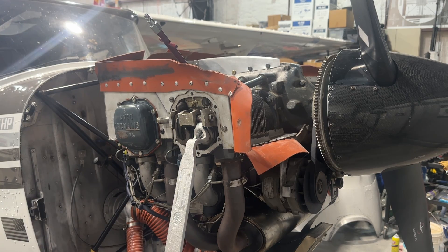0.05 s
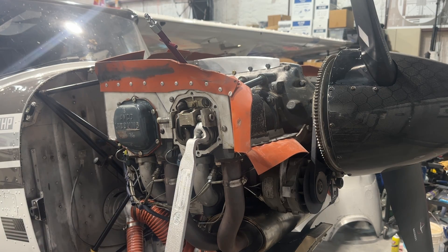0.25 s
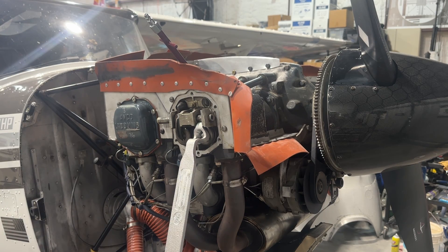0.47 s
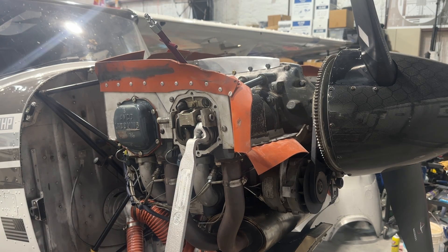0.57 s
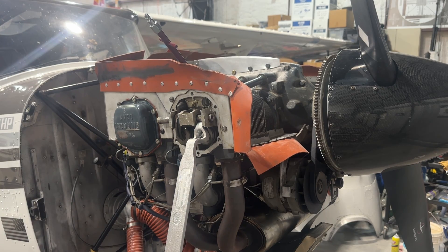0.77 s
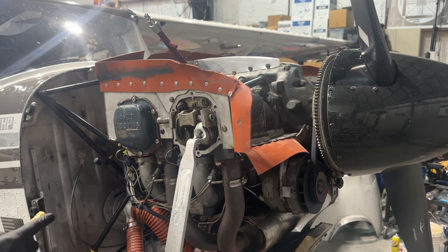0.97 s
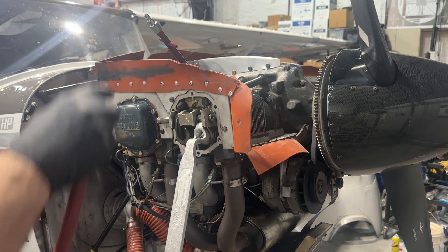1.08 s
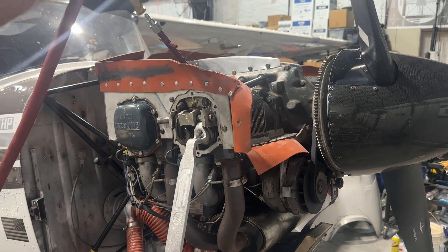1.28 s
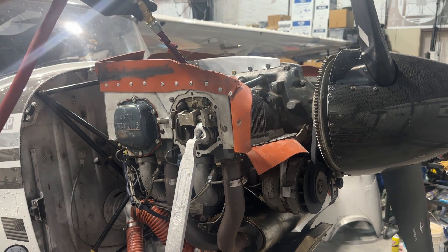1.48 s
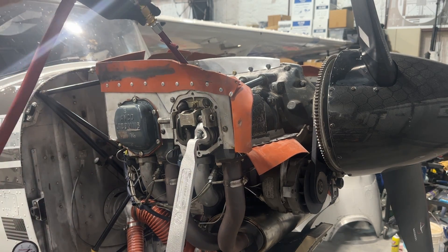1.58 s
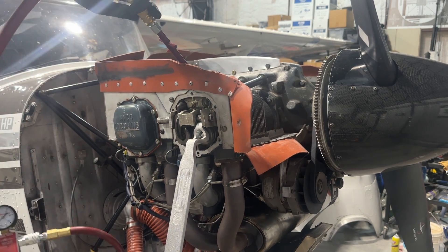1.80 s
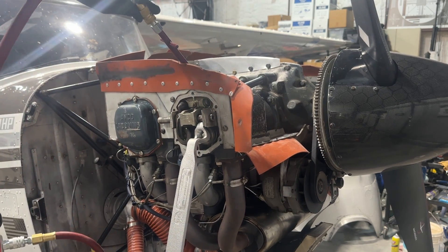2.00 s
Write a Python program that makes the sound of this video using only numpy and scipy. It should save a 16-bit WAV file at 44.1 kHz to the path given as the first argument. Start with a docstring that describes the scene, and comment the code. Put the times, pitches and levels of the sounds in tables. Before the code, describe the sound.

A short hiss of compressed air from an uncoupled hose, then light metal clinks.

```python
"""Compressed air escapes as a hose is uncoupled: a sharp spit, then the hiss of a turbulent jet that
weakens as the pressure falls. The hose is then handled: friction makes it rustle and scrape,
and impacts excite the natural modes of its metal fittings, which clink against an engine.
Distant machines rumble and hum in the reverberant workshop; two microphone ports stand close by."""
import sys
import numpy as np
from scipy import signal
from scipy.fft import rfft, irfft
from scipy.io import wavfile
from scipy.ndimage import uniform_filter1d, map_coordinates

SR = 44100
rng = np.random.default_rng(int(sys.argv[2]) if len(sys.argv) > 2 else 0)


def master(y):
    """Save y as 16-bit WAV."""
    cut = np.clip(np.atleast_2d(y).T, -1, 1)
    pcm = np.round(cut * 32767)  # scale
    wavfile.write(sys.argv[1], SR, pcm.astype(np.int16))


N = 90404
T, HZ = np.arange(N) / SR, np.fft.rfftfreq(N, 1 / SR)
RELEASE_S = 0.1932

# workshop sound at the two ports (frequency [Hz], coherence [0-1], left lead [rad], left - right [dB])
ROOM_AT_PORTS = [(78, 1, 0.058, 0), (396.7, 0.48, 0.016, 1.4), (2500, 0.23, 0.1, 0.5), (6550, 0.3, .3, 7),
                 (8500, 0.27, 0.082, 0.5)]


def jet(weak_from_s=.37, weak_by_s=.49, eddy_db=2, flutter_db=.5):
    """Turbulent jet noise: as pressure falls the hiss weakens and narrows onto the coupling's modes."""
    # spectra at full and at low pressure (frequency [Hz], relative level [dB])
    full_spectrum = [(500, -26.5), (900, -20.5), (1650, -6.5), (2600, -8.5), (3900, -8.5), (5100, 0.5),
                     (6800, 3.5), (8000, -5), (10200, -10), (11800, -4.5), (15000, 0.5)]
    weak_spectrum = [(550, -38.5), (2100, -11.5), (2900, -16.5), (5300, -8.5), (6200, 3), (7300, -11),
                     (10200, -24.5), (11500, -11), (13500, -20), (15500, -7)]
    # strength of the jet (time [s], level [dB])
    strength = [(.195, -100), (.206, -26.5), (.24, -21.5), (.375, -22.5), (.45, -28), (.496, -29),
                (.55, -38), (.6, -43.5), (.666, -54), (.8, -78.5)]
    weak = np.clip((T - weak_from_s) / (weak_by_s - weak_from_s), 0, 1)
    air = np.sqrt(1 - weak) * noise(full_spectrum) + np.sqrt(weak) * noise(weak_spectrum)
    air = early_reflections(cowling_echo(air), echo_db=-9)
    hz, t, spectra = signal.stft(air, SR, nperseg=256)
    eddies = uniform_filter1d(rng.standard_normal(spectra.shape[1:]), size=10, axis=0)
    eddies = unit(uniform_filter1d(eddies, size=8, axis=1))  # patches in frequency and time
    # a low-pass fade removes the treble from 0.55 s on
    treble_octaves = np.log2(np.maximum(hz / 5500, 1))
    fade_db = 156.5 * np.outer(treble_octaves, np.maximum(t - .55, 0))
    air = signal.istft(spectra * amp(eddy_db * eddies - fade_db), nperseg=256)[1][:, :N]
    return air * envelope(strength) * amp(flutter_db * drift(rate_hz=150))


def cowling_echo(x, delay_s=.00286, growth_per_s=.125, echo_db=-7):
    """Comb filtering: an echo interferes with the hiss; the notches slide down as the hose recoils."""
    emitted_s = T - delay_s * (1 + growth_per_s * (T - RELEASE_S))
    echo = np.array([map_coordinates(side, [emitted_s * SR]) for side in x])
    return unit(x - amp(echo_db) * echo)


def spit(rise_s=.011, hold_s=.011, decay_s=.012, level_db=-15.5):
    """Sudden expansion: the seal breaks with a blast, and the sleeve rings as it snaps back."""
    # spectrum of the blast (frequency [Hz], relative level [dB])
    spectrum = [(200, -24.5), (380, -27), (560, -17.5), (850, -21), (2200, -20.5), (2900, -5.5), (4100, -8),
                (5200, -2), (6900, 0.5), (8500, -5), (10500, -13.5), (15500, -1.5)]
    # modes of the sleeve (frequency [Hz], level [dB], T60 [s])
    sleeve_modes = [(3640, -38.5, 0.43), (5140, -31, 0.14), (6820, -27.5, 0.19), (8420, -22, 0.13)]
    t = np.maximum(T - RELEASE_S, 0)
    shape = np.minimum(t / rise_s, 1) ** 2 * np.exp(-np.maximum(t - rise_s - hold_s, 0) / decay_s)
    return amp(level_db) * shape * noise(spectrum) + ring(RELEASE_S + rise_s, sleeve_modes)


def plug():
    """Damped vibration: the freed plug taps twice, its ring shortened by the hand."""
    # taps (time [s])
    taps = [.752, .764]
    # mode of the plug (frequency [Hz], level [dB], T60 [s])
    modes = [(2612, -46, 0.057)]
    return sum(ring(start, modes) for start in taps)


def knocks(clatter_db=7.5, ring_db=-4.5, bass_lag_s=.0046, bracket_s=1.298):
    """Impact excitation: each knock is a brief clatter of contacts that sets the fittings ringing."""
    # knocks (time [s], clatter decay [s], then a level [dB] for each of the four bands)
    impacts = [(.747, 0.016, -56.5, -53.5, -63, -55), (1.295, 0.0073, -38, -37.5, -34.5, -46),
               (1.3734, 0.0042, -42.5, -39.5, -30.5, -44.5), (1.390, 0.02, -54, -48.5, -48, -67),
               (1.440, 0.016, -50, -45.5, -42, -52), (1.5496, 0.0084, -46.5, -31.5, -36.5, -49),
               (1.968, 0.012, -61, -60, -47, -60.5), (1.9787, 0.0091, -46, -48.5, -40.5, -44.5)]
    # band centres (frequency [Hz])
    bands = [1050, 2040, 3090, 4950]
    # spectrum of the clatter (frequency [Hz], relative level [dB])
    spectrum = [(120, -31), (300, -7), (560, 2.5), (1500, 3.5), (2100, 5.5), (2700, -2.5), (3500, 6.5),
                (4200, 0.5), (7200, -1.5), (10000, -6), (11300, -39), (14000, -11)]
    # modes of the fittings (frequency [Hz], relative level [dB], T60 [s])
    fitting_modes = [(1241, -6.5, 0.16), (1830, -6, 0.1), (2145, -5.5, 0.18), (3118, -4.5, 0.069),
                     (3500, -9, 0.22), (3780, -14, 0.16), (5190, -4.5, 0.098), (7040, 1.5, 0.08)]
    # modes of an engine bracket, rung by the hardest knock (frequency [Hz], level [dB], T60 [s])
    bracket_modes = [(553.6, -38.5, 0.11), (973, -34.5, 0.067), (2342, -42, .08), (3490, -36.5, 0.064)]
    out = np.zeros((2, N))
    bass = 1 / (1 + (HZ / 1400) ** 6)
    for start, decay, *band_db in impacts:
        weight = list(zip(bands, band_db))
        rise = .25 * decay  # longer clatters start more softly
        colour = amp(at_hz(spectrum, HZ) + at_hz(weight, HZ) + clatter_db)
        contacts = rfft(rng.standard_normal((2, N))) * colour
        out += irfft(contacts * bass, N) * strike(start, rise + bass_lag_s, decay)
        out += irfft(contacts * (1 - bass), N) * strike(start, rise, decay)
        out += ring(start, [(hz, db + at_hz(weight, hz) + ring_db, t60) for hz, db, t60 in fitting_modes])
    return early_reflections(out + ring(bracket_s, bracket_modes), echo_db=-17)


def scrapes(relative_half_width=.07, relative_fall=.05):
    """Stick-slip friction on the engine: uneven slips excite one slightly sinking resonance per stroke."""
    # strokes of hose and fittings (time [s], duration [s], resonance [Hz], level [dB])
    strokes = [(1.098, 0.039, 810, -72), (1.385, 0.083, 735, -55), (1.382, .09, 4750, -54),
               (1.432, 0.028, 7280, -50.5), (1.3, 0.077, 6100, -55)]
    out = np.zeros((2, N))
    grip = np.exp(.5 * drift(rate_hz=200))
    for start, length, hz, db in strokes:
        along = np.clip((T - start) / length, 0, 1)
        carrier = np.exp(2j * np.pi * np.cumsum(hz * (1 - relative_fall * along)) / SR)
        slips = irfft(rfft(rng.standard_normal((2, 2, N))) / (1 + (HZ / (relative_half_width * hz)) ** 2), N)
        resonance = slips[0] * carrier.real + slips[1] * carrier.imag
        out += amp(db) * np.sqrt(abs(np.sin(np.pi * along))) * unit(grip * resonance)
    return out


def handling(rustle_grain_db=2, scuff_grain_db=3):
    """Friction and light impacts: the moving hose rustles, scuffs and ticks in bursts of noise."""
    # the hose slides through the hands (time [s], level [dB])
    sliding = [(0, -67.5), (.11, -86), (.65, -76.5), (.78, -66), (.98, -66.5), (1.06, -70.5), (1.17, -67),
               (1.23, -74), (1.45, -65.5), (1.6, -80), (1.87, -65), (1.92, -80.5), (2.05, -62)]
    # dull scuffs (time [s], half-length [s], level [dB])
    scuff_events = [(1.542, 0.0088, -53.5), (1.725, 0.017, -63.5), (1.79, 0.028, -60.5),
                    (1.838, 0.016, -59)]
    # ticks of hose and gauge (time [s], decay [s], level [dB])
    tick_events = [(0.869, 0.014, -55), (1.1859, 0.0048, -45), (1.2489, 0.00052, -42.5),
                   (1.287, .0008, -46), (1.357, 0.00072, -46), (1.663, 0.0073, -56)]
    # spectra of the three sounds (frequency [Hz], relative level [dB])
    rustle_spectrum = [(300, -8), (1200, -1.5), (6200, 3), (8800, 2), (11000, -26.5), (15000, -9.5)]
    scuff_spectrum = [(150, 2.5), (320, -0.5), (1200, 0), (2500, -7), (7000, -39)]
    tick_spectrum = [(300, -9), (4000, 7.5), (7000, 15.5), (11000, -20), (15000, -7)]
    grain = drift(rate_hz=200)
    rustle = noise(rustle_spectrum) * envelope(sliding)
    rustle *= unit(amp(rustle_grain_db * (grain + drift(rate_hz=16))))
    swells = sum(amp(db) * np.exp(-((T - centre) / width) ** 2) for centre, width, db in scuff_events)
    scuffs = noise(scuff_spectrum) * swells * unit(amp(scuff_grain_db * grain))
    pulses = sum(amp(db) * strike(start, .00029, decay) for start, decay, db in tick_events)
    return rustle + scuffs + noise(tick_spectrum) * pulses


def bumps():
    """Heavy damping: each soft bump of the rubber hose lasts a few cycles and sags in pitch."""
    # bumps (time [s], initial frequency [Hz], peak level [dB], decay [s], exponent of the pitch fall [-])
    events = [(1.1926, 1070, -48.5, 0.0063, 2.01), (1.221, 131, -40, 0.0066, .12),
              (1.272, 115.5, -47.5, 0.0295, .17)]
    out = np.zeros(N)
    for start, hz, db, decay, sag in events:
        age = np.maximum(T - start, 0) / decay
        cycles = np.cumsum(hz * (age > 0) * (1 + age) ** -sag) / SR
        out += amp(db) * age * np.exp(1 - age) * np.sin(2 * np.pi * cycles)
    return out


def machines(waver=.02):
    """Machine noise: distant machines give a continuous rumble spectrum and two wavering hum lines."""
    # spectrum of the rumble and lines of the hum (frequency [Hz], relative level [dB])
    spectrum = [(25, -4), (80, 6), (120, -3.5), (170, -1), (230, -10.5), (400, -18.5), (800, -31.5),
                (5000, -36), (16000, -70)]
    hum_lines = [(78, -8), (168, -12)]
    # strength of both together (time [s], level [dB])
    strength = [(.2, -54.5), (.45, -60.5), (.7, -58.5), (1.3, -57), (1.6, -53), (2.05, -53.5)]
    hum = np.zeros(N)
    for hz, db in hum_lines:
        cycles = np.cumsum(hz * (1 + waver * drift(rate_hz=5.2))) / SR
        hum += amp(db) * np.sqrt(2) * np.sin(2 * np.pi * cycles)
    return (ports(noise(spectrum), ROOM_AT_PORTS) + hum) * envelope(strength)


def early_reflections(x, echo_db, count=24):
    """Interference: reflections off engine and cowling, 1 to 33 ms late, comb the sound."""
    taps = np.zeros((2, SR // 30))
    for side in taps:
        echoes = rng.choice([-1, 1], count) * amp(echo_db) / np.sqrt(count)
        side[rng.integers(SR // 1000, len(side), count)] = echoes
    taps[:, 0] = 1
    return signal.fftconvolve(x, taps / np.linalg.norm(taps[0]), axes=1)[:, :N]


def reverberation(x):
    """Diffuse field: the workshop's tail decays exponentially, fastest in the treble."""
    # reverberation time (frequency [Hz], T60 [s])
    t60 = [(1000, 0.56), (3000, 0.54), (15000, 0.26)]
    hz, t, spectra = signal.stft(rng.standard_normal((2, SR)), SR, nperseg=256)
    tail = signal.istft(spectra * amp(-60 * t / at_hz(t60, hz)[:, None]), SR, nperseg=256)[1]
    tail[:, :SR // 200] = 0  # begins after 5 ms
    return signal.fftconvolve(x, tail / np.linalg.norm(tail[0]), axes=1)[:, :N]


def ports(x, table, size=512):
    """Partial coherence: two unrelated signals mix into a stereo pair of set likeness, phase and balance."""
    table, hz = np.array(table), np.fft.rfftfreq(size, 1 / SR)
    coherence, lead, pan_db = (at_hz(table[:, [0, k]], hz) for k in (1, 2, 3))
    shared, apart = np.sqrt((1 + coherence) / 2), np.sqrt((1 - coherence) / 2)
    sides = np.array([amp(pan_db), np.exp(-1j * lead)]) * np.sqrt(2 / (1 + amp(pan_db) ** 2))
    mixing = sides[:, None] * np.array([[shared, apart], [shared, -apart]])
    taps = np.fft.fftshift(irfft(mixing), -1) * np.hanning(size)
    return signal.fftconvolve(x[None], taps, axes=-1).sum(1)[:, size // 2:][:, :N]


def ring(start, modes, relative_split=.05, rise_s=.0019):
    """Free vibration: each mode beats with a weaker, shorter-lived neighbour; sides are in quadrature."""
    t, out = T[:SR // 2], np.zeros(N + SR, complex)
    at, onset = round(start * SR), np.minimum(t / rise_s, 1)
    for hz, db, t60 in modes:
        decay = amp(-60 * t / t60)
        beat_hz = hz * rng.normal(0, relative_split)
        neighbour = .5 * np.sqrt(decay) * np.exp(2j * np.pi * (beat_hz * t + rng.random()))
        tone = np.exp(2j * np.pi * (hz * t + rng.random()))
        out[at:at + len(t)] += amp(db) * onset * decay * (1 + neighbour) * tone
    return np.array([out.real, out.imag])[:, :N]


def strike(start, rise, decay):
    """Transient envelope: linear rise, exponential fall."""
    t = np.maximum(T - start, 0)
    return np.minimum(t / rise, 1) * np.exp(-np.maximum(t - rise, 0) / decay)


def noise(spectrum):
    """Two incoherent noises of one spectrum, rms 1."""
    return unit(irfft(rfft(rng.standard_normal((2, N))) * amp(at_hz(spectrum, HZ)), N))


def drift(rate_hz):
    """Low-pass random fluctuation, rms 1."""
    return unit(irfft(rfft(rng.standard_normal(N)) * np.exp(-(HZ / rate_hz) ** 2), N))


def envelope(points):
    """Gain from a (time [s], level [dB]) table."""
    return amp(np.interp(T, *np.transpose(points)))


def at_hz(points, hz):
    """Interpolates a (frequency [Hz], value) table on a logarithmic frequency axis."""
    f, value = np.transpose(points)
    return np.interp(np.log(hz + 1), np.log(f + 1), value)


def amp(db):
    return 10 ** (np.asarray(db) / 20)


def unit(x):
    return x / np.sqrt(np.mean(x ** 2) + 1e-20)


def scene(air_room_db=-16, hardware_room_db=-12):
    """Superposition: escaping air and handled hardware, with their reverberation, over the machines."""
    # the air at the two ports (frequency [Hz], coherence [0-1], left lead [rad], left - right [dB])
    air_at_ports = [(500, .7, 0, .5), (1500, .3, 2.2, 0), (2200, .3, 1, 2), (3200, .3, 4.3, -.5),
                    (5000, .45, .9, 5), (7000, .65, 1.4, 10), (8200, .7, -.1, .5), (9100, .73, -.6, .5),
                    (11200, .99, -3.15, 0), (12900, .88, -4.5, 0), (14000, .99, -6.2, 0),
                    (15000, .98, -6.35, 0), (15800, .86, -7.3, 0)]
    air = spit() + jet()
    hardware = knocks() + handling() + scrapes()
    hardware = hardware + amp(hardware_room_db) * reverberation(hardware) + plug()
    air = air + amp(air_room_db) * reverberation(air)
    return ports(air, air_at_ports) + ports(hardware, ROOM_AT_PORTS) + bumps() + machines()


def record(dry, cutoff_hz=15850):
    """Band limiting: a steep low-pass filter removes the highest treble."""
    lowpass = signal.firwin(801, cutoff_hz, window=("kaiser", 8), fs=SR)
    return signal.oaconvolve(dry, lowpass[None], "same")


dry = scene()
out = record(dry)
master(out)
```